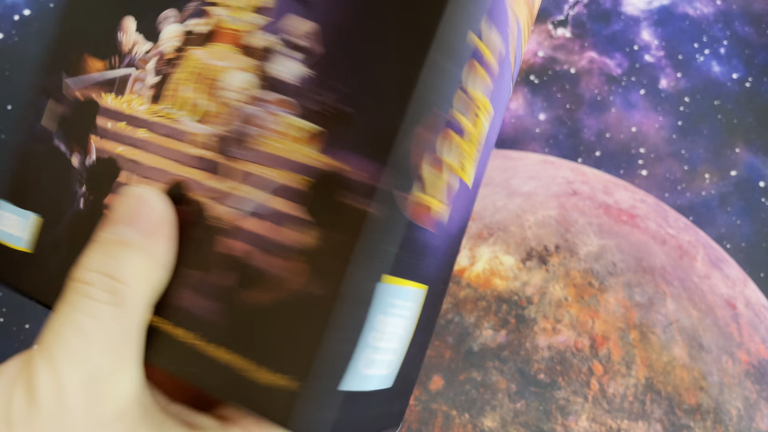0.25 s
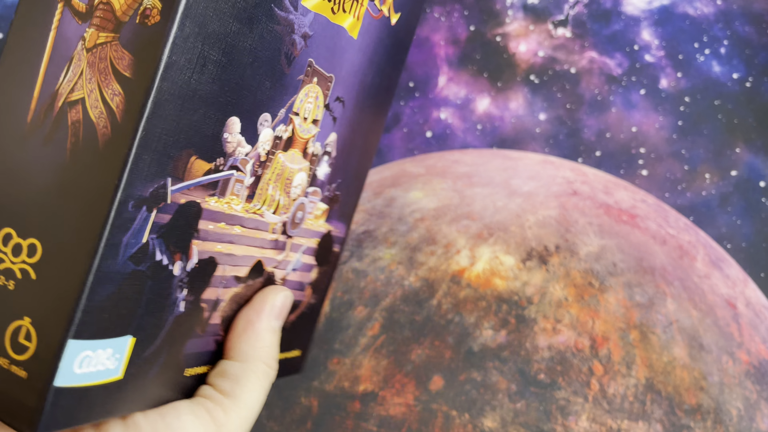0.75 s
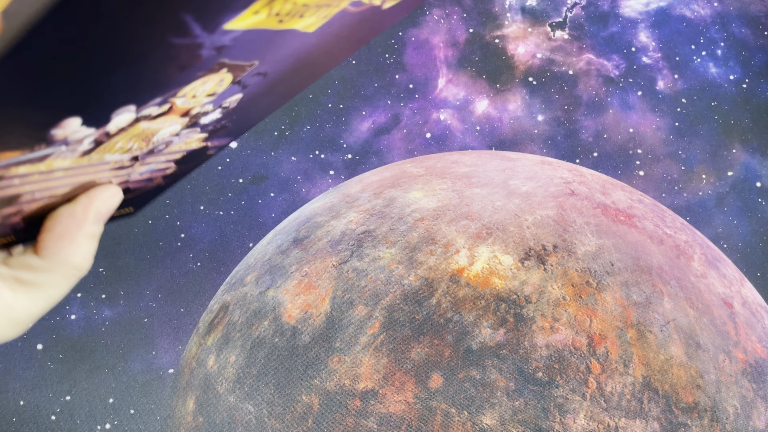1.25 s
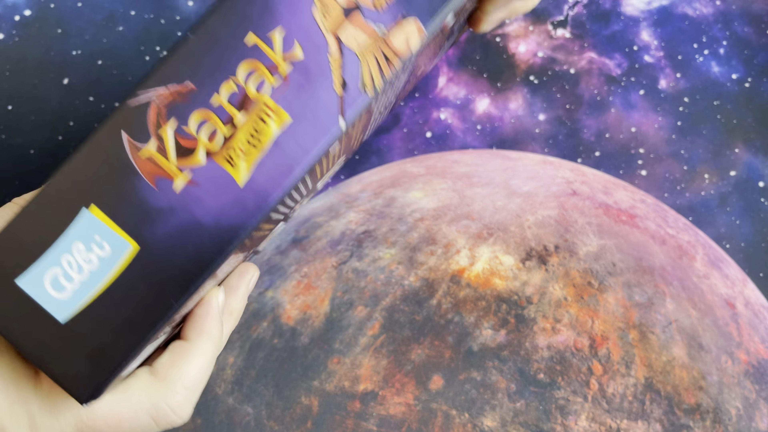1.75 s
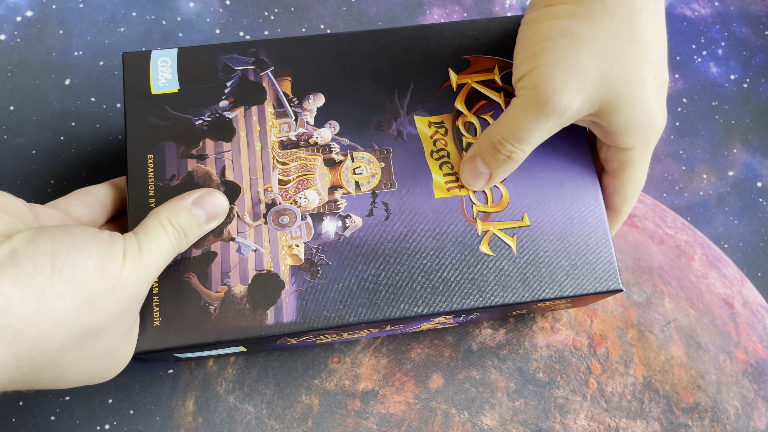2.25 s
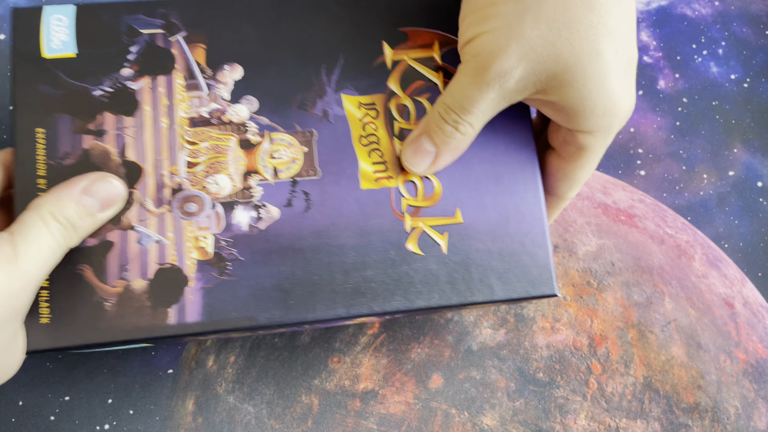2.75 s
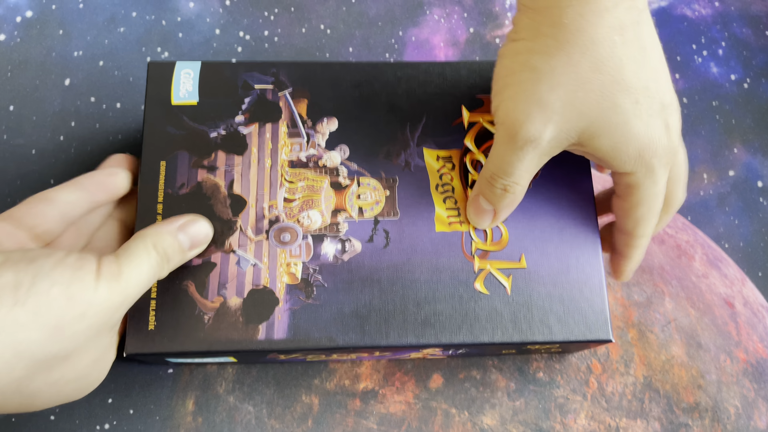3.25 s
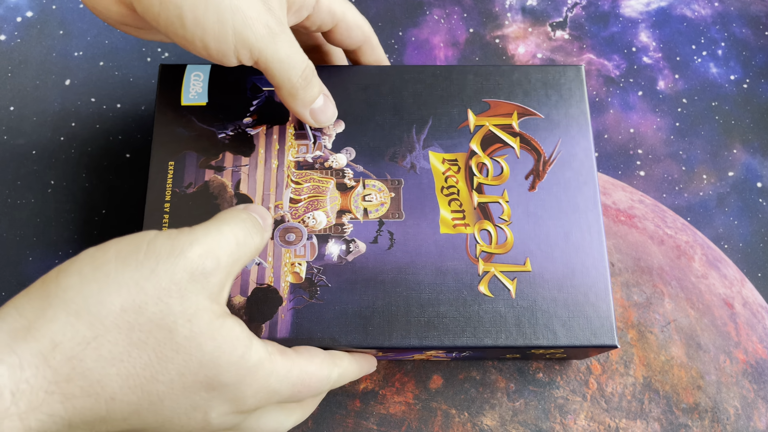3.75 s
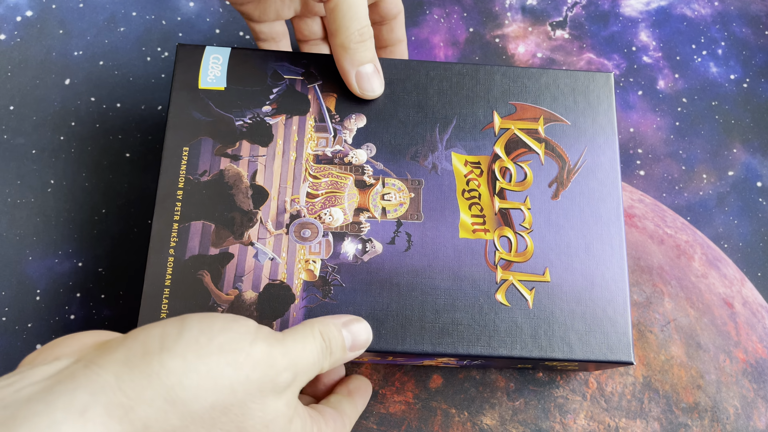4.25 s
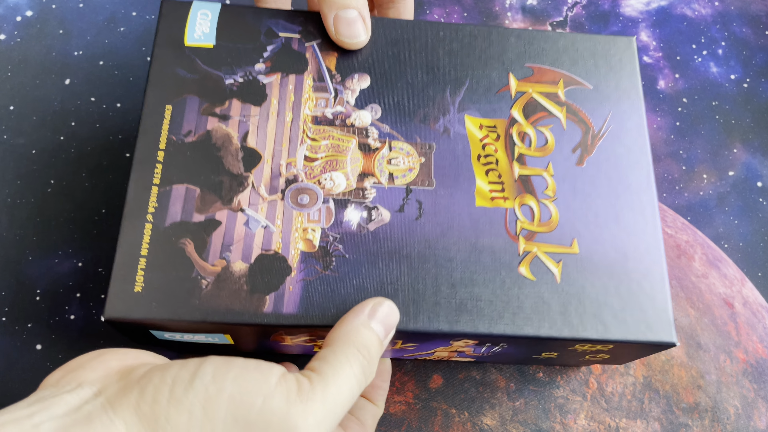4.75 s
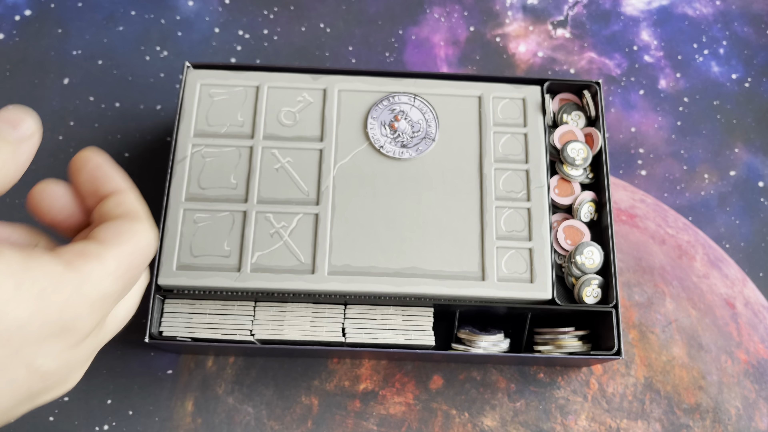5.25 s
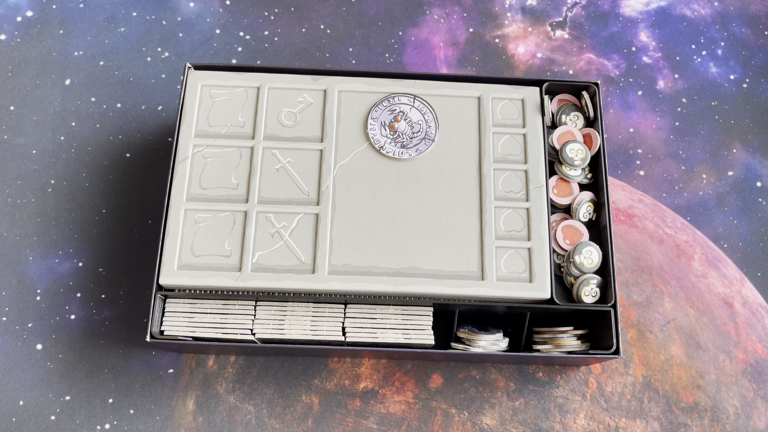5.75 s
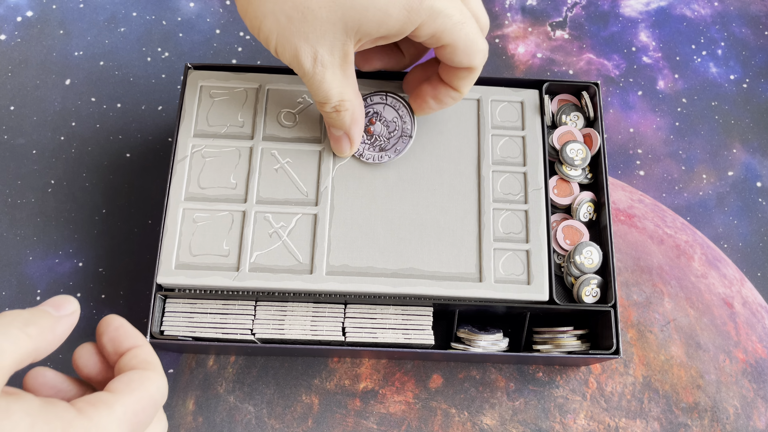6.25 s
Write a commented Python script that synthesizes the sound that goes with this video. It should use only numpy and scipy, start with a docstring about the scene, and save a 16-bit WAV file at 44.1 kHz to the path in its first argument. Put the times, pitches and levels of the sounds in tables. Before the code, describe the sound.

A stereo phone close to the table hears a heavy card box being flipped, with dry rubbing, sharp taps and rattling contents, slightly louder on the left. A low, soft thud sets it down. Quiet rubbing follows, then a stuttering hollow lid creak, soft bumps and faint hissy finger strokes on plastic.

```python
"""Skin and card rasp first, close to the microphones: a full cardboard game box is turned over in the hands.
Pieces inside slide, tick and knock, the box thumps onto a padded table, its tight lid judders free,
and fingertips brush a plastic tray. Random slips make the rubbing and short noise bursts the knocks and taps;
damped sines ring the tray and table, and falling sines make the thumps.
A phone with two microphone ports hears it from close by in a small quiet room."""
import sys
import numpy as np
from scipy import signal
from scipy.fft import rfft, irfft
from scipy.io import wavfile
from scipy.ndimage import uniform_filter1d

SR = 44100
rng = np.random.default_rng(int(sys.argv[2]) if len(sys.argv) > 2 else 0)


def dump(signal):
    """Clip the signal to [-1, 1] and save it as 16-bit WAV at the path in sys.argv[1]."""
    limited = np.clip(np.atleast_2d(signal).T, -1, 1)
    pcm = np.round(limited * 32767).astype(np.int16)
    wavfile.write(sys.argv[1], SR, pcm)


N = 286650
TIME = np.arange(N) / SR  # s

# resonances of the cardboard walls: [f/Hz, width/Hz, level/dB]
PANELS = [(238, 120, 3.5), (347, 170, 6.5), (906.6, 400, 0), (1030, 59, -6), (2530, 80, -7.5),
          (3310, 570, 5)]


def undb(db):
    """Decibels to gain."""
    return 10 ** (np.asarray(db) / 20)


def unit(x):
    """Scale to rms 1."""
    return x / np.sqrt(np.mean(x ** 2))


def burst(x, span):
    """Scale a short sound to the energy of rms 1 held for span seconds."""
    return x * np.sqrt(span * SR / np.sum(x ** 2))


def colour(x, points):
    """Filter by (Hz, dB) points joined by straight lines over log frequency."""
    hz, db = np.transpose(points)
    f = np.maximum(np.fft.rfftfreq(x.shape[-1], 1 / SR), 1)
    gain = undb(np.interp(np.log(f), np.log(hz), db))
    return irfft(rfft(x) * gain, x.shape[-1])


def resonate(x, hz, width):
    """One resonance, gain 1 at its centre."""
    b, a = signal.iirpeak(min(hz, SR / 2 - 1), hz / width, fs=SR)
    return signal.lfilter(b, a, x)


def resonate_twice(x, hz, width):
    """Two equal resonances in a row, with steeper skirts than one."""
    return resonate(resonate(x, hz, width), hz, width)


def panels(x, plain_db):
    """The box walls ring with whatever shakes them; a share passes uncoloured."""
    ringing = sum(undb(db) * resonate(x, hz, width) for hz, width, db in PANELS)
    return undb(plain_db) * x + ringing


def walk(rate):
    """Smoothed random drift of rms 1, heading for a new value rate times a second."""
    k = int(SR / rate)
    steps = np.repeat(rng.standard_normal(N // k + 1), k)
    return unit(uniform_filter1d(steps, k)[:N])


def slips(size, rate, spread_db):
    """Tiny stick-slip releases at random moments, of unequal strength."""
    happens = rng.random(size) < rate / SR
    strength = undb(spread_db * np.clip(rng.standard_normal(size), -2, 2))
    return happens * rng.choice([-1, 1], size) * strength


def add(track, s, sound):
    """Mix a sound into a track at time s."""
    i = int(s * SR)
    track[i:i + len(sound)] += sound[:N - i]


def ring(modes, t60, t):
    """Struck (Hz, dB) modes dying away, a little different at every blow."""
    waves = 0
    for hz, db in modes:
        detune, phase = rng.uniform(-1, 1, 2)
        waves = waves + undb(db) * np.sin(2 * np.pi * hz * (1 + .012 * detune) * t + np.pi * phase)
    return waves * undb(-60 * t / t60)


def swell(s, length, hz, width_hz, db):
    """A narrow resonance of noise that rises and fades round time s."""
    tone = resonate_twice(rng.standard_normal(N), hz, width_hz)
    return unit(tone) * undb(db) * np.exp(-((TIME - s) / length) ** 2)


def strokes(rows, rise_db_per_s, fall_db_per_s):
    """Gain of (start, length, dB) strokes: each rises, holds for its length and dies away."""
    power = 1e-14  # a floor far below hearing
    for s, length, db in rows:
        before = np.maximum(s - TIME, 0)
        after = np.maximum(TIME - s - length, 0)
        below = rise_db_per_s * before + fall_db_per_s * after
        power = power + undb(db - np.minimum(below, 120)) ** 2
    return np.sqrt(power)


def reflections(early_db, tail_db):
    """Quick reflections off box and table, then a short tail; cloth and hands swallow their treble."""
    t60 = 0.24  # s
    t = TIME[:SR // 2]
    tail = rng.standard_normal(len(t)) * undb(-60 * t / t60) * np.minimum(t / 0.023, 1)
    early = rng.standard_normal(len(t)) * t * np.exp(-t / .005)
    response = undb(early_db) * burst(early, 1 / SR) + undb(tail_db) * burst(tail, 1 / SR)
    return signal.lfilter(*signal.butter(1, 3800, fs=SR), response)


def room(x, early_db, tail_db, left_db):
    """Each port hears the direct sound and its own reflections, which keep changing as box and hands move."""
    poses = np.array([walk(20) for _ in range(3)])
    poses /= np.linalg.norm(poses, axis=0)
    out = []
    for side, lag in ((1, 0), (-1, 3)):  # left, right; lag in samples
        heard = np.pad(x, (lag, 0))[:N]  # the sound reaches the left port first
        for pose in poses:
            response = reflections(early_db, tail_db)
            heard = heard + signal.oaconvolve(x * pose, response)[:N]
        # the left is louder, except in the highest treble
        balanced = colour(heard, [(5500, side * left_db / 2), (8000, 0)])
        out.append(balanced / np.sqrt(1 + np.sum(response ** 2)))
    return np.array(out)


def room_tone():
    """Faint steady air, mostly shared by both ports."""
    # colour of the air, before it is set to its level: [f/Hz, level/dB]
    quiet = [(25, -9.5), (70, 9.5), (420, -18.5), (700, -25.5), (2200, -31.5)]
    air = rng.standard_normal(N) + 0.23 * rng.standard_normal((2, N))
    return undb(-67.5) * unit(colour(air, quiet))


def inrush():
    """Air fills the opening box: one low, slow swell of noise."""
    return swell(s=4.96, length=0.17, hz=88, width_hz=60, db=-50)


def squeaking():
    """Card and plastic squeak briefly under a sliding edge or finger."""
    # squeaks, centred on t: [t/s, length/s, f/Hz, level/dB]
    squeaks = [(4.502, 0.017, 2450, -52.5), (4.944, 0.024, 2520, -56), (5.662, 0.01, 943, -55),
               (6.478, .025, 1098, -56.5)]
    return sum(swell(s, length, hz, hz / 5, db) for s, length, hz, db in squeaks)


def thumping():
    """The higher bending waves arrive first, so each dead thud falls in pitch; the table booms on after it."""
    # soft blows of the whole box or lid: [t/s, level/dB, starting f/Hz]
    thumps = [(0.349, -32, 595), (2.94, -47, 200), (1.557, -48, 520), (3.07, -25, 190), (3.099, -26, 159),
              (3.247, -17.5, 215), (3.278, -26.5, 189), (3.638, -42.5, 477), (3.681, -40.5, 324),
              (4.121, -53, 480), (4.813, -45, 480), (5.147, -44, 620), (5.519, -48, 416),
              (5.546, -42.5, 473), (6.093, -50, 200)]
    # modes of the table top: [f/Hz, level/dB]
    table_modes = [(75, 0), (110, -4.5), (148, -6.5)]
    thud_hz, sag_s, thud_s = 84.5, 0.0068, 0.019  # deep note of table and box, fall time, length
    out, t = np.zeros(N), TIME[:SR // 2]
    for s, db, start_hz in thumps:
        hz = thud_hz + (start_hz - thud_hz) * np.exp(-t / sag_s)
        thud = np.sin(2 * np.pi * np.cumsum(hz) / SR) * np.exp(-(t / thud_s) ** 2)
        boom = ring(table_modes, t60=0.42, t=t) * np.minimum(t / thud_s, 1)
        share = undb(3.5) * thud_hz / start_hz  # light, high blows barely stir the table
        add(out, s, undb(db) * burst(unit(thud) + share * unit(boom), 1 / 25))
    return out


def juddering_lid():
    """The tight lid sticks and slips in uneven jerks; its creak follows the slip rate and rings the hollow card."""
    # the lid juddering up the sides of the box: [t/s, slips per second/Hz, level/dB]
    judder = [(4.36, 217, -61), (4.445, 230, -40), (4.485, 305, -43.5), (4.522, 347, -36),
              (4.549, 244, -46), (4.642, 225, -42.5), (4.689, 275, -32), (4.745, 445, -38.5),
              (4.781, 520, -33.5), (4.806, 550, -49)]
    # resonances of the hollow lid: [f/Hz, half the width of each of two filters/Hz, level/dB]
    lid_modes = [(264, 120, 9), (807, 112, 7), (1500, 310, -8), (2440, 77, -9)]
    s, hz, db = np.transpose(judder)
    rate = np.interp(TIME, s, hz)
    turns = np.cumsum(rate * (1 + .08 * walk(200))) / SR
    jerks = undb(3.5 * walk(85))
    pulses = np.diff(np.floor(turns), prepend=0)  # one click per slip
    drive = .7 * unit(pulses) + rng.standard_normal(N)
    hollow = sum(undb(gain_db) * resonate_twice(drive, f, 2 * width) for f, width, gain_db in lid_modes)
    creak = unit(np.sin(2 * np.pi * turns))
    tone = (unit(hollow) + undb(-2.5) * creak) * jerks
    moving = (TIME > s[0]) & (TIME < s[-1])
    return tone / np.std(tone[moving]) * moving * undb(np.interp(TIME, s, db))


def tapping():
    """A brief gritty contact rings the stiff card for a few cycles, at the pitch of the spot it lands on."""
    # single sharp taps of loose pieces and fingernails: [t/s, level/dB, f/Hz]
    taps = [(0.074, -31, 4630), (0.205, -48.5, 885), (0.322, -29, 1900), (0.58, -41.5, 1260),
            (0.657, -29, 2400), (0.844, -35.5, 3080), (1.077, -34, 1390), (1.117, -33, 5100),
            (1.256, -36, 990), (1.342, -37, 3380), (1.425, -41, 2200), (1.581, -35, 5500),
            (1.867, -41, 3840), (1.993, -35, 3570), (2.402, -60.5, 885), (2.526, -36.5, 1240),
            (4.623, -49, 647), (4.923, -49, 620), (6.064, -52, 2220), (6.333, -55, 2000)]
    out, t = np.zeros(N), TIME[:SR // 20]
    for s, db, hz in taps:
        contact = rng.standard_normal(len(t)) * np.exp(-t / .0009)
        add(out, s, undb(db) * burst(resonate_twice(contact, hz, 1.1 * hz), 1 / 100))
    return out


def clacking():
    """A hard piece cracks against the tray, which rings until the pieces lying on it damp it."""
    # pieces dropping hard against the plastic tray inside: [t/s, level/dB, f/Hz, ring t60/s]
    clacks = [(0.344, -22, 1103, 0.04), (0.351, -19.5, 1027, .025), (0.367, -23.5, 1100, 0.076),
              (1.093, -18, 1120, 0.0069), (1.8, -31.5, 962, 0.025), (1.822, -25.5, 947, 0.018),
              (1.847, -28, 860, 0.016)]
    # modes of the tray: [multiple of f, level/dB]
    tray_modes = [(1, -0.5), (1.66, -12.5), (2.12, -10.5), (2.98, -13)]
    out, t = np.zeros(N), TIME[:SR // 6]
    for s, db, hz, t60 in clacks:
        modes = [(hz * multiple, mode_db) for multiple, mode_db in tray_modes]
        tray = ring(modes, t60, t) * np.minimum(t * hz, 1)
        contact = rng.standard_normal(len(t)) * np.exp(-t / .001)
        crack = resonate(contact, 2 * hz, 2 * hz)
        add(out, s, undb(db) * burst(unit(tray) + undb(-14) * unit(crack), 1 / 100))
    return out


def crackling(slide):
    """Loose pieces and card edges tick at random, each at its own pitch, as hard as the slide that moves them."""
    ticks = 0
    for hz, _, _ in PANELS[2:]:  # the higher panel pitches only
        catches = slips(N, rate=20, spread_db=3)
        ticks = ticks + resonate_twice(catches, hz, 1.5 * hz) / np.sqrt(hz)
    return undb(-5) * unit(ticks) * slide


def sliding():
    """Gain of card and contents on the move: a slide takes hold quickly and runs out more slowly."""
    # slides as the box is turned, gripped and opened: [t/s, length/s, level/dB]
    slides = [(0.0, 0.045, -33.5), (0.28, 0.1, -29.5), (0.55, 0.053, -46), (0.675, 0.13, -38.5),
              (0.955, 0.16, -48), (1.23, 0.11, -41.5), (1.37, 0.22, -45), (1.562, 0.026, -32),
              (1.775, 0.2, -41), (1.885, 0.021, -30), (2.04, 0.17, -54.5), (2.46, 0.11, -51),
              (2.55, 0.12, -38.5), (2.738, 0.011, -31), (2.8, 0.075, -52.5), (2.96, 0.22, -58),
              (3.075, 0.055, -48.5), (3.22, 0.052, -44.5), (3.64, 0.29, -66.5), (4.04, 0.087, -71.5),
              (4.22, 0.3, -60.5), (4.67, 0.13, -59), (4.995, 0.24, -64)]
    return strokes(slides, rise_db_per_s=599.5, fall_db_per_s=286)


def rubbing(slide):
    """Dense slips rasp on the card, drone in the panels and hiss under the skin."""
    # palms and fingers gliding over the printed card: [t/s, length/s, level/dB]
    glides = [(0.0, 0.025, -37), (0.275, 0.046, -41.5), (0.56, 0.34, -46), (0.66, 0.14, -48),
              (1.03, 0.67, -53.5), (1.55, 0.18, -59), (1.88, 0.017, -37), (1.98, 0.11, -54.5),
              (2.16, 0.075, -64.5), (2.55, 0.09, -56.5), (2.99, 0.11, -58.5), (3.72, 0.15, -59.5),
              (4.29, 0.22, -59), (4.68, 0.084, -53), (5.02, .14, -47.5), (5.19, 0.16, -54)]
    # fingertips brushing the open tray: [t/s, length/s, rasp level/dB, hiss level/dB]
    brushes = [(5.518, 0.035, -73, -59.5), (5.642, 0.018, -63.5, -53.5), (6.056, 0.011, -50, -60.5),
               (6.163, 0.062, -56, -55), (6.322, 0.093, -75, -54), (6.452, 0.082, -67.5, -55)]
    # colours of the three sounds, before each is set to rms 1: [f/Hz, level/dB]
    rasp_colour = [(300, -6), (520, -2), (900, -1.5), (2000, -5), (3300, -14.5), (4500, -14), (8000, -21.5)]
    drone_colour = [(40, -15), (140, -4.5), (220, 7), (480, 2.5), (900, -22)]
    hiss_colour = [(2000, -13), (3500, -14), (5200, -7), (7000, -6.5), (8600, 0.5), (10500, -9.5),
                   (12000, -11)]
    glide = strokes(glides, rise_db_per_s=411, fall_db_per_s=305.5)
    rasp_rows = [(s, length, db) for s, length, db, _ in brushes]
    hiss_rows = [(s, length, db) for s, length, _, db in brushes]
    brush_rasp = strokes(rasp_rows, rise_db_per_s=1090.5, fall_db_per_s=395)
    brush_hiss = strokes(hiss_rows, rise_db_per_s=1090.5, fall_db_per_s=395)
    # the drone is at -41.5 dB under a firm slide of -26 dB and gains 0.39 dB per dB of slide
    shake = undb(-41.5) * (slide / undb(-26)) ** 0.39
    grip = undb(3.5 * walk(110))
    grains = slips(N, rate=1200, spread_db=3.5) * grip
    rasp = unit(colour(panels(grains, plain_db=6.0), rasp_colour))
    drone = unit(colour(slips(N, rate=580, spread_db=5.5) * grip, drone_colour))
    hiss = unit(colour(unit(grains) + rng.standard_normal(N), hiss_colour))
    return rasp * (slide + brush_rasp) + drone * shake + hiss * (glide + brush_hiss)


def knocking():
    """Each knock is a swelling crush of small contacts; softer contact sounds lower."""
    # contents, fingers and lid on the box: [t/s, body level/dB, crack level/dB, f/Hz, time scale of the crush/s]
    knocks = [(0.265, -31, -25.5, 900, 0.0059), (0.344, -13.5, -14, 1694, 0.0047),
              (0.632, -31.5, -33, 600, 0.0069), (0.712, -32, -38.5, 297, 0.01),
              (0.78, -22.5, -24, 2120, 0.0068), (1.088, -22, -38.5, 1030, 0.0043),
              (1.225, -34, -62, 1670, 0.0053), (1.553, -29, -32.5, 422, 0.0035),
              (1.760, -26, -32.5, 2330, 0.0056), (2.556, -18.5, -24.5, 2880, 0.009),
              (2.653, -29, -39.5, 1650, 0.0046), (2.67, -29, -35.5, 1830, 0.0039),
              (2.749, -21, -26.5, 2880, 0.0031), (3.062, -35.5, -54, 553, 0.0071),
              (3.196, -39, -52, 517, 0.0033), (3.224, -29, -46.5, 520, 0.0036),
              (3.243, -14.5, -27.5, 476, 0.002), (3.634, -37.5, -63, 580, 0.0036),
              (3.671, -42, -55.5, 453, 0.0081), (4.488, -37, -68, 815, 0.014),
              (4.943, -45.5, -53.5, 900, .011), (4.992, -39, -47, 790, 0.008),
              (5.317, -43.5, -60, 900, 0.017), (5.513, -45, -81.5, 600, .031),
              (6.167, -50, -70, 1770, 0.015)]
    out, t = np.zeros(N), TIME[:SR // 8]
    for s, db, crack_db, hz, length in knocks:
        pressure = t / length * np.exp(-1.5 * (t / length) ** 2)
        contacts = rng.choice([-1, 1], len(t)) * undb(5 * rng.standard_normal(len(t)))
        crush = pressure * contacts
        pitched = resonate(resonate(crush, hz, 1.7 * hz), hz, 7.4 * hz)
        soft = signal.butter(2, min(1.3 * hz, SR / 4), fs=SR, output="sos")
        body = signal.sosfilt(soft, panels(pitched, plain_db=-1.5))
        crack = resonate(crush, 6500, 3400)
        add(out, s, undb(db) * burst(body, 1 / 100) + undb(crack_db) * burst(crack, 1 / 100))
    return out


def scene():
    """Card sounds scatter round the room; taps, clacks and lid face the phone, drier; thumps are driest."""
    slide = sliding()
    low = thumping() + inrush()
    facing = tapping() + clacking() + crackling(slide) + juddering_lid()
    thumps = room(low, early_db=-28.5, tail_db=-20.5, left_db=1.5)  # nearly alike at both ports
    near = room(facing, early_db=-3, tail_db=-4.5, left_db=3.5)
    rubs = room(rubbing(slide) + squeaking(), early_db=5.0, tail_db=0.0, left_db=3.5)
    knocks = room(knocking(), early_db=3.0, tail_db=-5.0, left_db=5.5)
    return room_tone() + thumps + near + rubs + knocks


def record(dry):
    """The deepest bass is removed, loud peaks are rounded softly, and nothing sounds above 12 kHz."""
    thinned = signal.sosfilt(signal.butter(3, 48, "high", fs=SR, output="sos"), dry)
    rounded = .85 * np.tanh(thinned / .85)
    return signal.sosfilt(signal.ellip(8, .2, 70, 12000, fs=SR, output="sos"), rounded)


dry = scene()
out = record(dry)
dump(out)
```